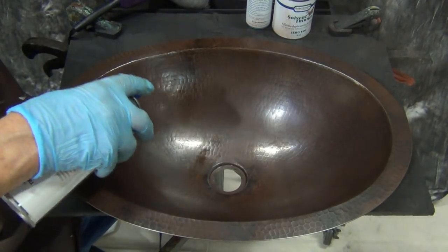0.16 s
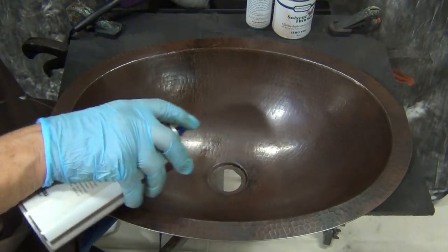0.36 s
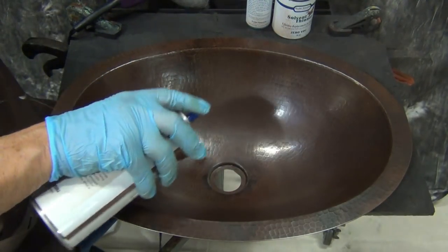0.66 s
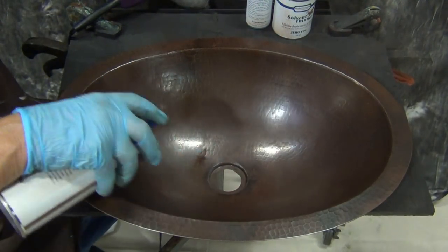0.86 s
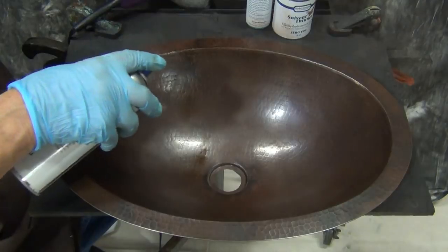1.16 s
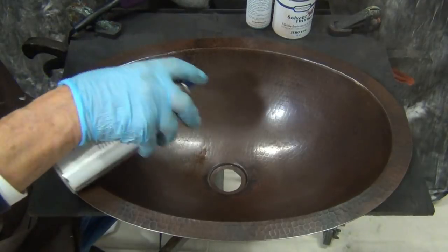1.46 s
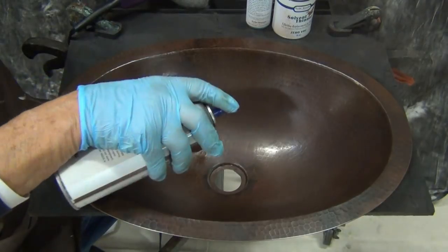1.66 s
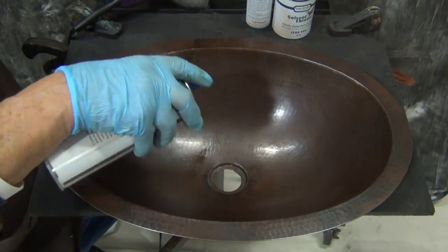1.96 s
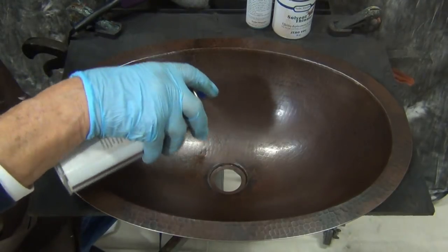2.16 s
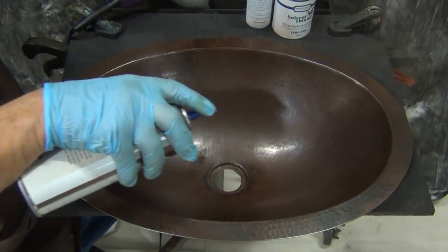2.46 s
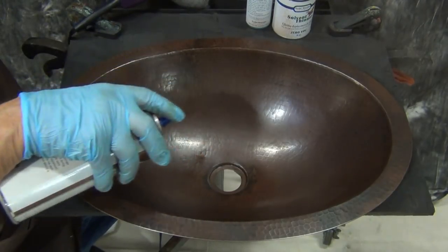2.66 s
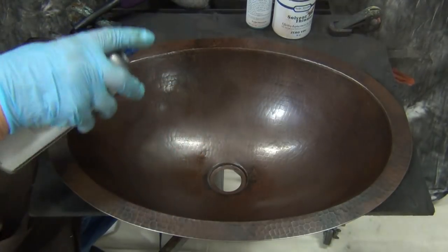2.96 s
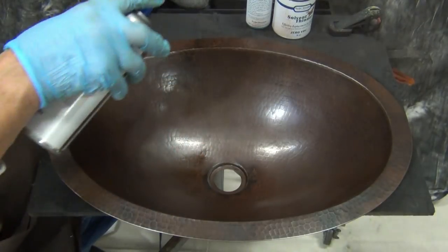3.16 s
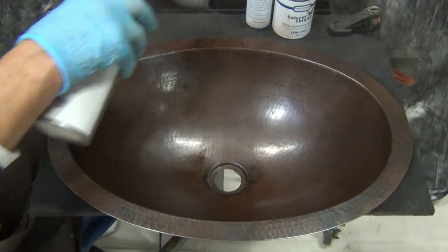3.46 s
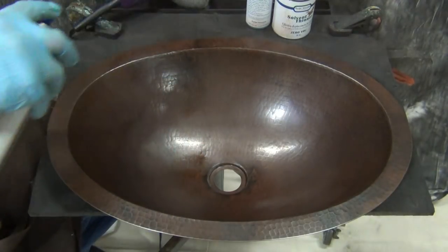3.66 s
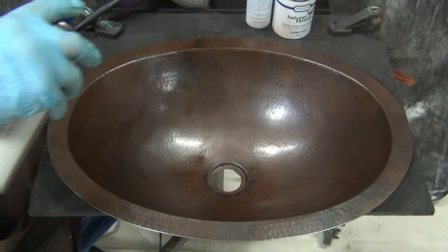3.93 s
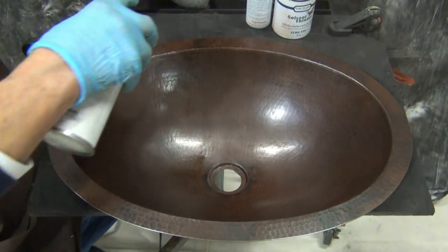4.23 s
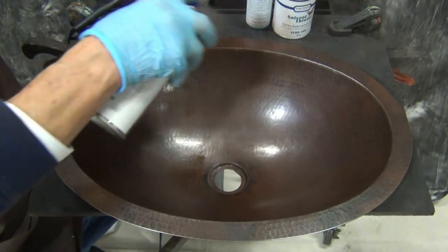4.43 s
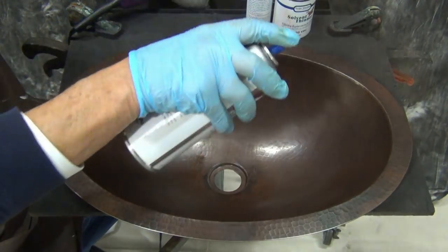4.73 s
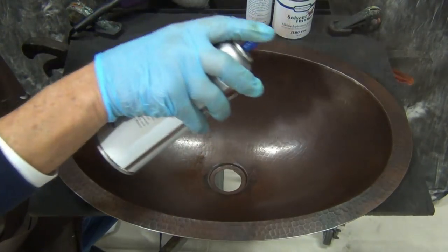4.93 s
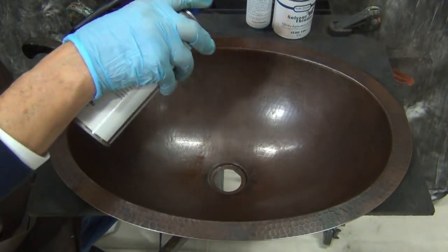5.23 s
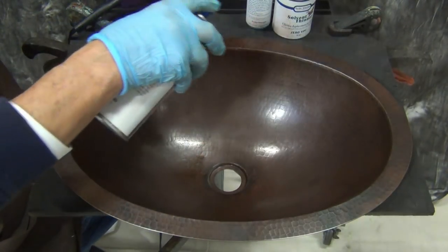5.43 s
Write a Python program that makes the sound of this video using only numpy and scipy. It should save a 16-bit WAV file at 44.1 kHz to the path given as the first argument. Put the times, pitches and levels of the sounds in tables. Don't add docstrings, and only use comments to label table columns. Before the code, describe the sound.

Aerosol bursts hiss sharply close by, a mixing ball clicks between them, and the can once strikes a metal bowl, which rings on over fan hum.

```python
import sys
import numpy as np
from scipy import signal
from scipy.fft import rfft, irfft, next_fast_len
from scipy.io import wavfile
from scipy.ndimage import uniform_filter1d, map_coordinates

SR = 44100
rng = np.random.default_rng(int(sys.argv[2]) if len(sys.argv) > 2 else 0)


def volts(x):
    e = np.asarray(x, float) / 20
    return 10 ** e


def generate_wav(signal):
    frames = np.transpose(np.atleast_2d(signal))
    scaled = np.clip(frames, -1, 1) * 32767
    pcm = np.round(scaled).astype(np.int16)
    wavfile.write(sys.argv[1], SR, pcm)


N = 246519
SIDES = np.array([[1], [-1]])

VALVE = [
    (.350, .582),
    (.888, 1.104),
    (1.528, 1.777),
    (2.264, 2.458),
    (2.869, 2.995),
    (3.523, 3.762),
    (4.509, 4.831),
]
# hiss in dB just open, midway and about to shut, rumble in dB re hiss.
FLOW = [(-23, -24, -22.5, -8), (-19.5, -24, -23.5, -7.5), (-25, -23, -21.5, -7.5), (-25.5, -25, -27, -4.5),
        (-19, -25, -26, -6.5), (-26, -28.5, -24, -4.5), (-25.5, -25.5, -25, -8)]
# comb crest of the nearest echo in Hz at start, midway and end,
# growth of the far echo paths per second.
PATH = [(7900, 7550, 7300, -.6), (7600, 7750, 7500, -.5), (7900, 7400, 7400, 0), (7300, 7300, 7700, -.8),
        (8000, 7600, 8000, -.4), (7300, 8200, 9200, -.6), (9100, 8200, 7600, .8)]


def rms_one(x):
    return x / np.sqrt(np.mean(x ** 2) + 1e-20)


def at_hz(points, hz):
    point_hz, value = np.transpose(points)
    return np.interp(np.log(hz), np.log(point_hz), value)


def gate(spans, rise_s, fall_s):
    t = np.arange(N) / SR
    return sum(np.clip(np.minimum((t - a) / rise_s, (b - t) / fall_s), 0, 1) for a, b in spans)


def hump(middle_s, half_s):
    return np.exp(-((np.arange(N) / SR - middle_s) / half_s) ** 2)


def drift(rate):
    r = np.exp(-40 * np.pi * rate / SR)
    slow = signal.lfilter([1], [1, -2 * r, r * r], rng.standard_normal(N // 20 + 3002))[3000:]
    return np.interp(np.arange(N) / 20, np.arange(len(slow)), rms_one(slow))


def ring(x, hz, t60):
    r, w = volts(-60 / (t60 * SR)), 2 * np.pi * hz / SR
    return signal.lfilter([0, np.sin(w)], [1, -2 * r * np.cos(w), r * r], x + 1e-18)


def decay(x, t60):
    return signal.lfilter([1], [1, -volts(-60 / (t60 * SR))], x)


def band(x, low_hz, high_hz):
    return signal.sosfilt(signal.butter(2, [low_hz, min(high_hz, .47 * SR)], "band", fs=SR, output="sos"), x)


def stereo_noise(spectrum, width, lean=((20, 0), (20000, 0))):
    # frequency in Hz, left-right likeness.
    likeness = [(60, 0.4), (180, 1), (550, 0.88), (1650, 0.94), (4970, 0.78), (15000, 0.85)]
    size = next_fast_len(N)
    hz = np.maximum(np.arange(size // 2 + 1) * SR / size, 10)
    mid, side = rfft(rng.standard_normal((2, size))) * volts(at_hz(spectrum, hz))
    alike = np.clip(1 - width * (1 - at_hz(likeness, hz)), 0, 1)
    pair = np.sqrt(1 + alike) * mid + np.sqrt(1 - alike) * side * SIDES
    return rms_one(irfft(pair * volts(at_hz(lean, hz) / 2 * SIDES), size)[:, :N])


def clicks(times, sizes):
    out = np.zeros(N)
    np.add.at(out, (np.asarray(times) * SR).astype(int), sizes)
    return out


def delayed(x, samples):
    return np.array([map_coordinates(c, [np.arange(N) - samples], order=2) for c in x])


def spray():
    # frequency in Hz, level in dB per Hz.
    jet_spectrum = [(240, -74), (400, -34), (1380, -10.5), (1800, -8), (2190, -12), (2980, -5),
                    (4650, -6.5), (5590, -6), (7470, 1), (9550, -3.5), (13800, -6.5), (15600, -9.5)]
    # rise in seconds, nozzle whistle in Hz, its level in dB re hiss.
    nozzle = [(0.0062, 4720, -12), (0.013, 4820, -10), (0.0076, 4420, -8.5), (0.014, 4440, -7.5),
              (.018, 4830, -10.5), (0.0052, 5030, -12.5), (0.011, 4620, -10)]
    spit_db, spit_s, sag_db = 14, 0.042, 5
    hiss_db, top_db, body_db, rumble_db, crest_hz, near_share, air_db = sweep()
    t = np.arange(N) / SR
    half_shut = 1 - gate(VALVE, rise_s=0.38 * spit_s, fall_s=spit_s)
    hiss_db = hiss_db - sag_db * half_shut
    body_db = body_db + sag_db * half_shut
    rumble_db = rumble_db + spit_db * half_shut
    direct = stereo_noise(jet_spectrum, width=0.59)
    jet = direct + basin_echoes(direct, crest_hz, near_share) + mirrored(direct)
    out = aimed(jet, [rumble_db + 8.0, body_db + 9.5, 0, top_db + 5.0], air_db)
    air = rng.standard_normal(N)
    opening = 0
    for (a, b), (rise_s, hz, db) in zip(VALVE, nozzle):
        here = slice(int(a * SR), int(b * SR))
        out[:, here] += volts(db) * rms_one(ring(air[here], hz, t60=0.0062))
        opening = opening + (t < b) * np.clip((t - a) / rise_s, 0, 1) ** 1.43
    shutting = gate(VALVE, rise_s=.001, fall_s=0.023) ** 0.5
    return volts(hiss_db - 1.5) * opening * shutting * out


def sweep():
    # top in dB re hiss at start and end, body in dB re hiss at start and end.
    aim = [(-5, 6, -18.5, -7.5), (-0.5, -7.5, -12.5, -15), (3.5, 4.5, -10, -10.5), (5, 12.5, -10.5, -4),
           (-2, 0, -17, -6), (-5, -0.5, -14.5, -8.5), (-2.5, 4.5, -13.5, -4.5)]
    near_share = [(.25, .35, .6), (.3, .25, .2), (.15, .3, .5), (.3, .5, .5), (.1, .25, .2), (.6, .4, .4),
                  (.3, .75, .05)]
    axis_air = [(2, -4), (-2, 6), (-1, -3), (1, -8), (-1, 3), (0, 1), (4.5, -1)]
    rows = []
    for (a, b), flow, turn, path, near, air in zip(VALVE, FLOW, aim, PATH, near_share, axis_air):
        top0, top1, body0, body1 = turn
        for k, p in enumerate((0, .5, 1)):
            top, body = top0 + p * (top1 - top0), body0 + p * (body1 - body0)
            airy = air[0] + p * (air[1] - air[0])
            rows.append((a + p * (b - a), flow[k], top, body, flow[3], path[k], near[k], airy))
    s, *columns = np.transpose(rows)
    return [np.interp(np.arange(N) / SR, s, c) for c in columns]


def basin_echoes(direct, crest_hz, near_share):
    # delay in milliseconds, share.
    rim_echoes = [(.62, .1), (.41, .15)]
    t = np.arange(N) / SR
    nearest = 2 * SR / uniform_filter1d(crest_hz, size=3000)
    out = near_share * delayed(direct, nearest)
    reach = 1
    for (a, b), (*_, growth) in zip(VALVE, PATH):
        from_middle = t - (a + b) / 2
        reach = reach + growth * np.clip(from_middle, -.2, .2) * (abs(from_middle) < .25)
    for delay_ms, share in rim_echoes:
        swing = volts(4 * drift(2.1) + 1.1 * rng.standard_normal() * SIDES)
        late = delay_ms * SR / 1000 * (reach + 0.082 * drift(4.1))
        out = out + share * swing * delayed(direct, late)
    return out


def mirrored(direct):
    # start and end in seconds, delay in milliseconds at start and end, share.
    mirrors = [(.35, .52, 1.8, 1.75, .3), (.35, .58, 1.27, 1.23, .25), (.46, .6, 1.38, 1.52, .35),
               (.44, .54, 1.0, .95, .3), (.5, .6, .95, .9, .2), (.87, 1.04, 1.82, 1.76, .35),
               (.99, 1.12, 1.6, 1.28, .35), (.95, 1.12, .5, .56, .25), (1.51, 1.68, 1.18, 1.22, .35),
               (1.64, 1.74, .7, .76, .3), (1.7, 1.8, .54, .58, .3), (1.66, 1.8, 1.3, 1.25, .2),
               (2.25, 2.36, 1.23, 1.27, .45), (2.27, 2.35, 1.55, 1.55, .3), (2.29, 2.38, .42, .42, .4),
               (2.32, 2.47, .72, .5, .35), (2.37, 2.48, 1.2, 1.27, .3), (2.85, 2.97, 1.72, 1.92, .35),
               (2.91, 2.99, 1.44, 1.44, .35), (2.86, 2.95, 1.27, 1.25, .2), (2.95, 3.02, 1.21, 1.21, .3),
               (3.51, 3.62, 1.6, 1.5, .3), (3.56, 3.66, .57, .55, .3), (3.62, 3.79, .48, .72, .3),
               (3.64, 3.72, 1.2, 1.2, .25), (4.5, 4.6, .42, .44, .35), (4.5, 4.66, 1.23, 1.15, .3),
               (4.62, 4.72, .75, .81, .35), (4.66, 4.84, 1.42, 1.62, .3), (4.7, 4.84, 1.65, 1.9, .25)]
    out = np.zeros((2, N))
    for a, b, first_ms, last_ms, share in mirrors:
        n = np.arange(int(a * SR), int(b * SR))
        p = (n - n[0]) / len(n)
        late = n - (first_ms + p * (last_ms - first_ms)) * SR / 1000
        lean = volts(0.4 * rng.standard_normal() * SIDES)
        near = direct[:, n[0] - 200:n[-1] + 1]
        echo = [map_coordinates(c, [late - n[0] + 200], order=3) for c in near]
        out[:, n] += share * lean * np.sin(np.pi * p) ** .5 * echo
    return out


def aimed(jet, parts_db, air_db):
    size = next_fast_len(N)
    lines = rfft(jet, size)
    octave = np.log2(np.arange(1, size // 2 + 2) * SR / size / 500)
    sputter = drift(72)
    out = 0
    for centre in np.arange(11) / 2:
        place = np.interp(centre, np.log2([3, 8, 15.6, 25]), range(4))
        tilt_db = sum(max(1 - abs(place - k), 0) * part for k, part in enumerate(parts_db))
        tilt_db = tilt_db + (centre == 5) * air_db
        part = irfft(lines * np.clip(1 - 2 * abs(octave - centre), 0, 1), size)[:, :N]
        out = out + volts(tilt_db + 0.76 * sputter + drift(2.1)) * part
    return out


def gulps():
    # middle in seconds, half-length in seconds, level in dB.
    gusts = [
        (0.966, 0.063, -34),
        (1.089, 0.0076, -37),
        (2.966, 0.012, -42),
        (3.67, 0.03, -36),
        (4.812, 0.016, -46),
    ]
    # frequency in Hz, width in Hz, level in dB.
    cavity = [(830, 43, 5), (974, 116, 9.5), (1650, 180, 6.5), (1850, 130, 9), (155, 110, 0),
              (338, 170, -6)]
    air = rng.standard_normal(N)
    tone = sum(volts(db) * rms_one(ring(air, hz, 3.1 / width)) for hz, width, db in cavity)
    swell = sum(volts(db) * hump(s, half_s) for s, half_s, db in gusts)
    return swell * rms_one(band(tone, 146, 3700))


def strike():
    # frequency in Hz, level in dB, t60 in seconds.
    rim = [(736, -31, 0.45), (970, -38, 0.93), (1913.8, -24, 0.62), (2076, -18, 0.38), (2129.1, -30, 0.88),
           (2159, -26, 0.42), (2367, -22, 0.55), (2572, -17, 0.35), (2608, -16, 0.38), (2763, -24, 0.5),
           (2798, -18, 0.3), (2938, -22, 0.33), (3130, -26, 0.48), (3223.3, -28, 0.75), (3978, -24, 0.3),
           (4810, -37, 0.9), (5099.3, -33, 0.95), (5128.9, -37, 1.1), (5340.2, -30, 0.75),
           (5395, -21, 0.36), (5811.3, -41, 1.15), (5909.5, -32, 0.83), (6247, -23, 0.45),
           (6996, -29, 0.55), (7191, -17, 0.42), (7350, -24, 0.42), (7527, -18, 0.36), (7760, -38, 0.95),
           (7841, -27, 0.43), (7950, -25, 0.44)]
    # frequency in Hz, level in dB, t60 in seconds.
    basin = [(811.5, -39, 2.2), (855.9, -45, 2), (1032, -40, 3), (1043, -38, 2.97), (1121.1, -43, 3.2),
             (1215.3, -48, 4.5), (1314.9, -39, 4.4), (1427.9, -48, 3.6), (1545, -45, 3.6),
             (1546.7, -46, 3.6), (1636.5, -30, .75), (1678.2, -44, 3.2), (1816.2, -36, 3.6), (1820, -38, 3),
             (1888.2, -27, .8), (1962.2, -32, 3), (1965, -41, 2.5), (2233.5, -16, .76), (2289.2, -32, 3.1),
             (2460.2, -22, 1.1), (2645.9, -36, 1.8), (2837, -37, 1.6), (3036.2, -37, 2.34),
             (3036.2, -18, .68), (3254.2, -27, .9), (3465.5, -45, 2.4), (3928.5, -35, 1.36),
             (4174.7, -35, 1.35), (4688.9, -48, 1.8), (5231.2, -42, 1.66), (5523.3, -47, 1.8),
             (6427.7, -47, 1.8), (7079, -40, 1.55), (7416.8, -27, .85), (8116.7, -36, 1.3),
             (8476, -43, 1.75), (8845, -41, 1.25), (10420, -44, 0.9)]
    # frequency in Hz, level in dB, t60 in seconds.
    touched = [(738, -22, 0.35), (1040, -28, 0.49), (1284, -21.5, 0.26), (3450, -25, 0.33), (5135, -23, .3)]
    # frequency in Hz, gain in dB.
    radiation = [(800, -0.5), (1300, 2), (2000, 1.5), (3500, 1), (5000, 2.3), (8000, 2)]
    fill_times = (.02, .085, .02)
    # time after the strike in seconds, level in dB.
    contacts = [
        (0, 3),
        (0.022, -16),
        (0.065, -12.5),
    ]
    # frequency in Hz, t60 in seconds, level in dB.
    thud = [(144, 0.21, -34), (288, 0.1, -26), (700, 0.23, -26.5), (1405, 0.179, -64), (2370, 0.47, -19.5),
            (4570, 0.26, -23.5), (6900, 0.17, -19), (2100, 1.6, -45), (2900, 1.6, -49.5), (3630, 1.3, -61),
            (6000, 1.5, -45.5), (7800, 1.8, -54)]
    strike_s, twin_share, twin_split = 1.579, .18, .002
    out, start = np.zeros((2, N)), int(strike_s * SR)
    t = np.arange(2 * SR) / SR
    end = np.clip(4 - 2 * t, 0, 1)
    scrape = [drift(38)[:len(t)] for k in range(6)]
    groups = ((rim, -0.5, 2.0), (basin, -0.3, 1.2), (touched, -0.4, 1.5))
    for (modes, gain_db, rough_db), fill_s in zip(groups, fill_times):
        swell = (1 - np.exp(-t / fill_s)) * end
        for k, (hz, level_db, t60) in enumerate(modes):
            phase, split, pan_db = rng.standard_normal(3) * [9, twin_split, 1.5]
            tone = np.sin(2 * np.pi * hz * t + hz // 10)
            tone = tone + twin_share * np.sin(2 * np.pi * hz * (1 + split) * t + phase)
            level_db = level_db + gain_db + at_hz(radiation, hz)
            tone = tone * volts(level_db - 60 * t / t60 + rough_db * scrape[k % 6])
            out[:, start:start + len(t)] += swell * tone * volts(pan_db * min(hz / 3000, 1.6) * SIDES)
    after_s, force_db = np.transpose(contacts)
    for hz, t60, level_db in thud:
        fade = decay(clicks(strike_s + after_s, volts(force_db + level_db)), t60)
        fade = uniform_filter1d(fade, size=201, origin=100)
        out += fade * rms_one(band(rng.standard_normal(N), hz / 1.08, hz * 1.47))
    return out


def ball():
    # frequency in Hz, level in dB, t60 in seconds.
    can = [
        [(2240, -3, .04), (2290, -6, .05), (2840, -8, .03), (3080, -7, .035)],
        [(1520, -6, .04), (1650, -4, .035), (1810, -6, .04), (1910, -10, .05)],
        [(3280, -7, .02), (3560, -5, .025), (3950, -9, .018), (4400, -6, .028), (4660, -6, .02),
         (5150, -8, .02)],
        [(6590, -13, .012), (7500, -8, .014), (8300, -10, .01), (10100, -8, .02), (11500, -9, .01)],
    ]
    damping = (1.05, .96, .62, .85)
    # knock in seconds, mode in Hz, gain in dB.
    favours = [(.1437, 3080, 7), (.1437, 5150, 9), (.1437, 10100, 6.5), (.1485, 5150, 8),
               (.1485, 11500, 19), (.178, 10100, -1), (2.7667, 2840, 6.5), (2.7804, 7500, -2),
               (2.7804, 3080, -8), (.1437, 4660, 4.5), (.178, 8300, 7), (.178, 7500, 2), (.178, 6590, -8),
               (.6371, 7500, -3), (.654, 8300, 5), (.7093, 3950, 9), (2.7667, 4400, 5), (2.7667, 8300, -11),
               (4.809, 1520, 6), (4.809, 2290, 6), (4.809, 1810, -9), (.1437, 7500, 9), (.1437, 3560, -4),
               (.1437, 6590, 7), (.1437, 1810, 8), (.6371, 3280, 1), (.6371, 4400, 7), (.6371, 3560, 4),
               (.6371, 3950, -5), (.6371, 3080, -5), (2.7667, 3560, 7.5), (2.7667, 4660, 5),
               (2.7667, 1650, -6), (2.7667, 3950, -5), (2.7667, 3080, -10), (2.7667, 5150, -14),
               (2.7667, 2290, 1), (2.7804, 2290, 10), (2.7912, 2290, 3.5), (2.7998, 2290, 8),
               (2.7667, 11500, 9), (2.7667, 10100, 1), (1.8441, 4660, 8), (1.8441, 5150, 2),
               (1.8441, 2290, 8), (1.864, 2290, 13), (1.8441, 8300, 6), (3.7242, 3280, -8),
               (3.7658, 10100, -6), (.178, 3280, -10), (.2012, 3280, -5), (1.8441, 4400, -7),
               (1.8441, 11500, 13), (1.8441, 10100, 7), (1.8441, 3560, -15), (1.8441, 1520, -14),
               (1.8441, 3950, -8), (2.898, 1810, 15.5), (2.898, 3280, 7), (2.9198, 1810, 11.5),
               (3.7242, 4400, 9), (3.7242, 1910, 7), (3.7242, 1650, -7), (3.7414, 1910, 15),
               (3.7414, 1650, -9), (3.7658, 1910, 13), (3.7658, 1650, -14), (3.7658, 1520, -3),
               (3.7658, 2240, -8), (3.7658, 4400, 4.5), (3.7658, 3560, -7)]
    # time in seconds, peak in dB.
    glances = [
        (1.2703, -33),
        (1.296, -51),
        (1.3084, -48),
        (1.321, -43),
        (1.344, -43),
        (1.354, -43),
        (1.487, -48),
        (3.9364, -42.5),
        (5.0215, -56),
        (5.0614, -60),
    ]
    s, peak_db, *part_db = knock_rows()
    glance_s, glance_db = np.transpose(glances)
    out = ring(clicks(glance_s, volts(glance_db)), 10060, t60=0.02)
    for family, rel_db, kept in zip(can, [0] + part_db, damping):
        for hz, level_db, t60 in family:
            late, luck = rng.standard_normal((2, len(s)))
            favour_db = sum(db * (abs(s - at) < .003)
                            for at, near_hz, db in favours if abs(near_hz / hz - 1) < .012)
            hit_db = peak_db + rel_db + level_db + favour_db - 2.5 + 1.5 * luck
            out = out + ring(clicks(s + .0009 * abs(late), volts(hit_db)), hz, kept * t60)
    fade = decay(clicks(s, volts(peak_db + part_db[-1] - 8.0)), t60=0.021)
    return band(out, 1300, 15400) + fade * rms_one(band(rng.standard_normal(N), 5300, 13000))


def knock_rows():
    # time in seconds, peak in dB, belly and tick in dB re peak.
    strays = [(0.1502, -26, -7, 4), (2.7675, -32, 1, -7), (2.8378, -53, 15.5, -10), (0.25, -38, 14, -9),
              (.2655, -48, 17, -14), (0.5588, -24.5, -3, -5), (0.71, -32.5, -15, -1), (1.0807, -41, -3, 15),
              (1.2715, -35, 2.5, 2.5), (1.3084, -57, -3, 11), (1.321, -49, 9, 5), (1.343, -47, 8, 7),
              (1.354, -45, 12, 2.5), (1.395, -52, 11, 1), (1.412, -54, 9, -6), (.7005, -48, -12, 8),
              (1.8436, -26, 7, 4.5), (1.8468, -34, -11, 3), (1.856, -35, -6, 6), (1.864, -31, -3, -2),
              (1.876, -36, -3, 2), (2.4369, -24.5, -7, 3), (2.898, -35.5, 6.5, 9.5), (2.919, -38.5, 8, 13),
              (2.9728, -41, 6, -8), (3.318, -49, -9, -1), (3.6387, -32, 3, 0), (3.7245, -28, 7.5, 6),
              (3.7402, -35.5, 6, 9), (3.7662, -32, 5.5, 5.5), (3.779, -53, -2, -4), (4.807, -34.5, 7, 3)]
    # time in seconds, first flight in seconds, share kept per bounce.
    drops = [
        (.1437, .0337, .69),
        (.6374, .0176, .78),
        (2.7667, .0137, .79),
    ]
    # hit in dB, clack in dB re hit, first bounce in dB, loss per bounce in dB,
    # belly gain per bounce in dB.
    force = [(-21.5, 12.5, -16, 5, 5), (-22, 7.5, -21.5, 6.5, 5), (-25.5, 11, -24.5, 4, 2.5)]
    rows = [(s, db, belly, tick + 3.5, tick) for s, db, belly, tick in strays]
    k = np.arange(6)
    for (s, flight, kept), (hit_db, hit_clack_db, first_db, loss_db, belly_db) in zip(drops, force):
        rows += [(s, hit_db, -4.5, hit_clack_db, 6)]
        bounce_s = s + np.cumsum(flight * kept ** k)
        rows += zip(bounce_s, first_db - loss_db * k, -11.5 + belly_db * (k + 1), -3.5 + 0 * k, -2 + 1.5 * k)
    return np.transpose(rows)


def rolling():
    # middle in seconds, half-length in seconds, level in dB, bright part in dB re level.
    swells = [(0.104, 0.08, -55.5, -1.5), (0.216, 0.022, -43, -19), (0.298, 0.046, -50.5, -22),
              (0.688, 0.024, -44.5, -28), (0.843, 0.037, -55.5, -8), (1.375, 0.087, -47.5, -14),
              (1.865, 0.018, -47.5, 6), (2.66, 0.11, -66, -13), (2.784, 0.024, -42.5, -31),
              (3.108, 0.031, -54.5, -5), (3.347, 0.027, -63.5, 0), (3.304, 0.44, -62.5, -16)]
    # frequency in Hz, width in Hz, level in dB.
    slosh = [(1820, 320, -17), (1870, 150, 13), (2510, 220, 2.5), (3120, 1600, 10.5)]
    # frequency in Hz, level in dB.
    singing = [(1700, -61), (1900, -55), (2165, -51.5), (2300, -58), (2900, -55.5), (3230, -56.5)]
    mist_db, mist_t60_s, mist_shine_db = -24.5, 0.56, 1
    t = np.arange(N) / SR
    mist = 0
    for (a, b), flow in zip(VALVE, FLOW):
        mist = mist + (t > b) * volts(flow[2] + mist_db - 60 * abs(t - b) / mist_t60_s)
    dull = mist + sum(volts(db) * hump(s, half_s) for s, half_s, db, _ in swells)
    bright = mist * volts(mist_shine_db)
    bright = bright + sum(volts(db + shine_db) * hump(s, half_s) for s, half_s, db, shine_db in swells)
    rub = rng.standard_normal((2, N)) * volts(2 * drift(26.8))
    low = rms_one(sum(volts(db) * rms_one(ring(rub[0], hz, 2.0 / width)) for hz, width, db in slosh))
    high = rms_one(band(rub[1], 2000, 10800))
    sing = sum(volts(db) * rms_one(ring(rub[1], hz, t60=0.076)) for hz, db in singing)
    return sing * hump(0.073, 0.11) + dull * low + bright * high


def room(x):
    room_t60_s, wall_cut_hz = 0.45, 9700
    size = next_fast_len(N + SR)
    w = 2 * np.pi * np.arange(size // 2 + 1) / size
    t60 = room_t60_s / np.sqrt(1 + (w * SR / (2 * np.pi * wall_cut_hz)) ** 2)
    out = np.zeros((2, len(w)), complex)
    for k, lag in enumerate(rng.uniform(0.0098, .03, 12) * SR):
        loop = volts(-60 * lag / SR / t60) * np.exp(-1j * w * lag)
        out[k % 2] += loop / (1 - loop) * (-1) ** (k // 2)
    out = out + 0.22 * out[::-1]
    return irfft(out * rfft(x, size), size)[:, :N]


def background():
    # frequency in Hz, level in dB.
    fan_spectrum = [(12, -65), (20, -52), (44, 0.5), (75, -15), (108, -3), (178, -8), (330, -1), (402, -8),
                    (476, -11.5), (745, -8.5), (907, -7.5), (2490, -20.5), (5310, -23.5), (14200, -29),
                    (16300, -20)]
    # frequency in Hz, left minus right in dB.
    fan_lean = [(28, -13), (60, -3.5), (240, 4.5), (950, -4), (3770, 2), (15000, 0.0)]
    # frequency in Hz, rms level in dB.
    whines = [(4317, -73.5), (5157, -69.5), (5281, -82), (5399, -71.5), (5997, -72), (15735, -54)]
    t = np.arange(N) / SR
    fan = volts(-50 + 1.4 * drift(8.8)) * stereo_noise(fan_spectrum, width=3.7, lean=fan_lean)
    hum = volts(-53.5) * rms_one(ring(rng.standard_normal(N), 108.7, t60=0.26)) * volts([[-2.5], [2.5]])
    duct = volts(-63.0) * rms_one(band(rng.standard_normal(N), 1530, 2000))
    beat = np.sin(2 * np.pi * (15 * t + 0.55 * drift(1.7)))
    whine = 0
    for hz, db in whines:
        throb = volts(db + 1.5 * beat + .8 * drift(25) - 3 * (hz < 9000))
        whine = whine + np.sqrt(2) * throb * np.sin(2 * np.pi * hz * t)
    insect = volts(-65) * np.clip(beat, 0, 1) * np.sin(2 * np.pi * 3200 * t)
    return fan + duct + hum + whine + insect


def scene():
    jet, knocks, clang = spray() + gulps(), ball() + rolling(), strike()
    echo = room(volts(-40.0) * jet.mean(axis=0) + volts(-23.5) * knocks + volts(-22.5) * clang.mean(axis=0))
    knocks = np.array([0.78 * knocks + 0.66 * np.roll(knocks, 1), knocks])
    return jet + knocks + clang + echo + background()


def band_limit(x):
    return signal.sosfilt(signal.butter(12, 16550, fs=SR, output="sos"), x)


def record(dry):
    rounded = np.tanh(dry)
    mix = signal.sosfilt(signal.cheby2(14, 42, 16020, fs=SR, output="sos"), rounded)
    return band_limit(mix)


dry = scene()
out = record(dry)
generate_wav(out)
```